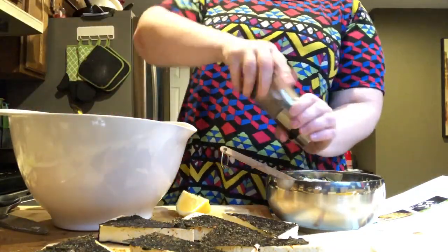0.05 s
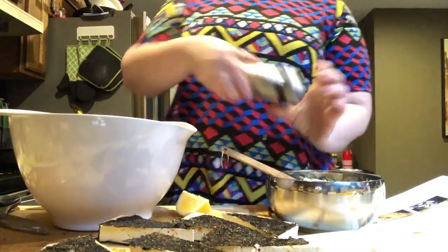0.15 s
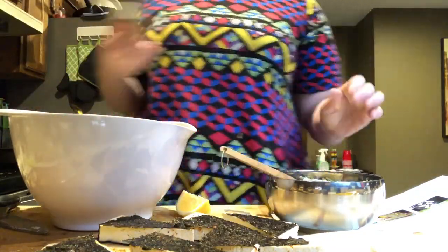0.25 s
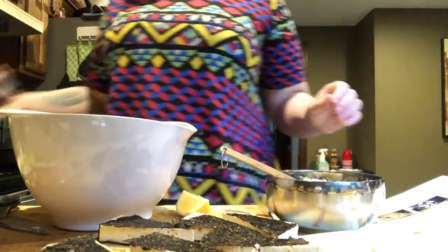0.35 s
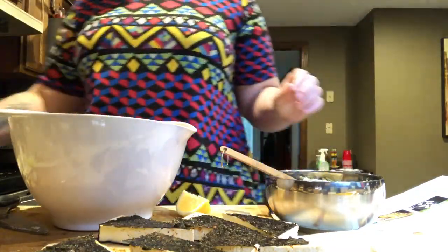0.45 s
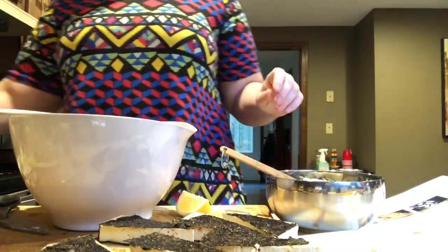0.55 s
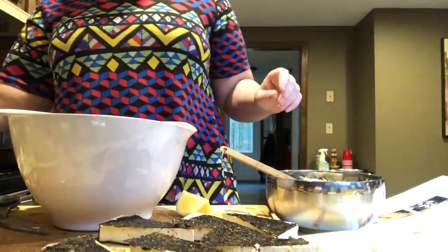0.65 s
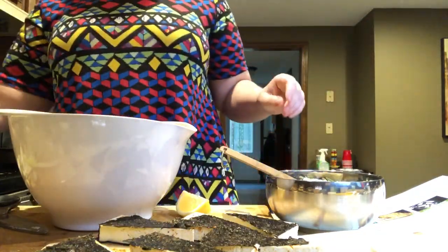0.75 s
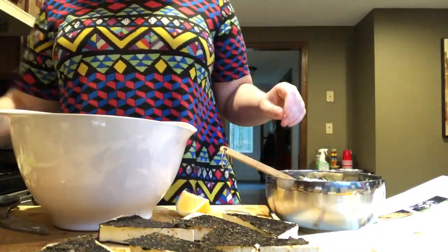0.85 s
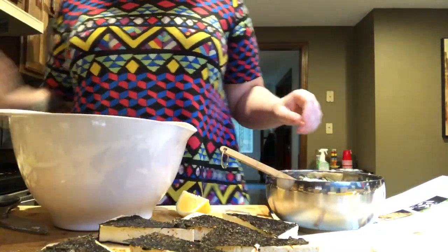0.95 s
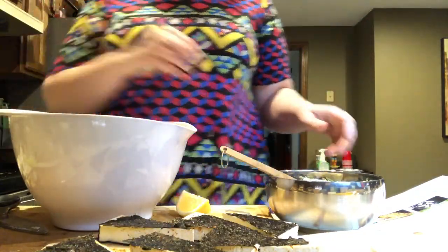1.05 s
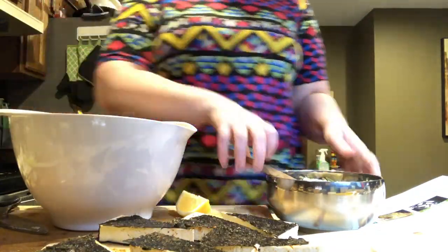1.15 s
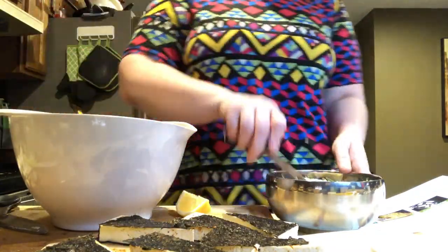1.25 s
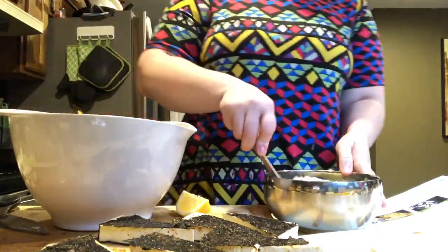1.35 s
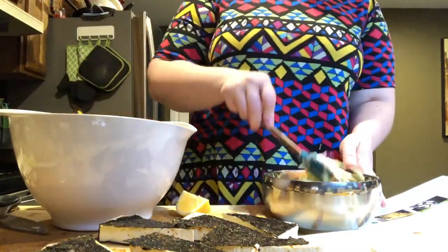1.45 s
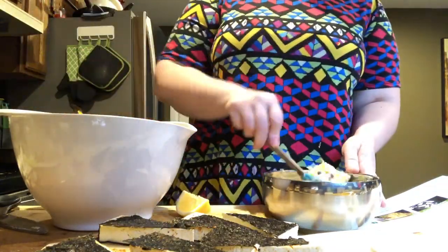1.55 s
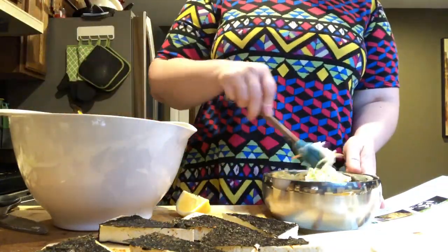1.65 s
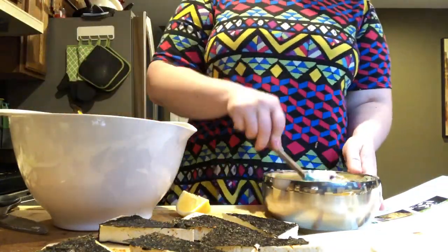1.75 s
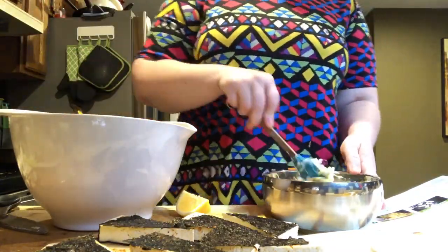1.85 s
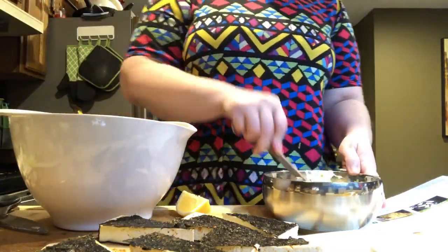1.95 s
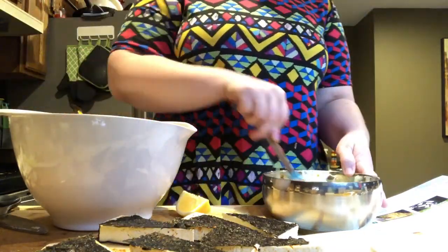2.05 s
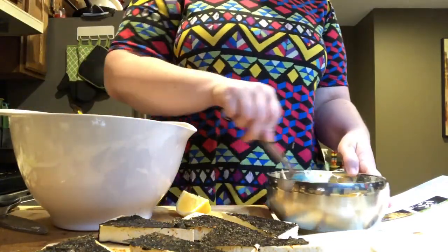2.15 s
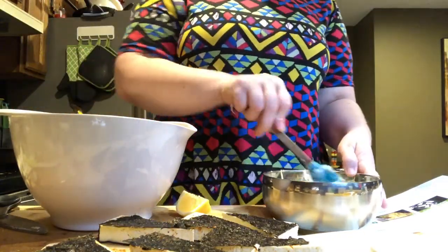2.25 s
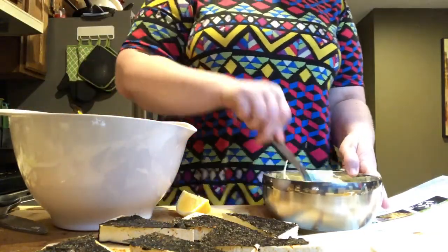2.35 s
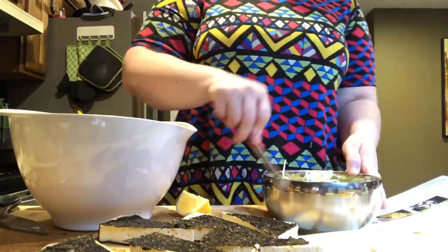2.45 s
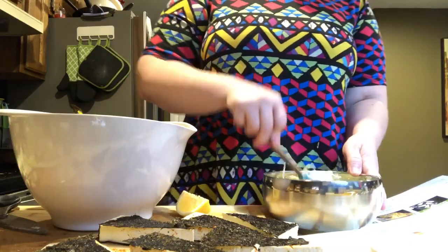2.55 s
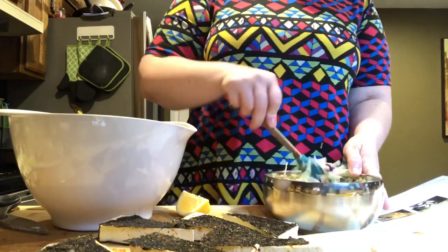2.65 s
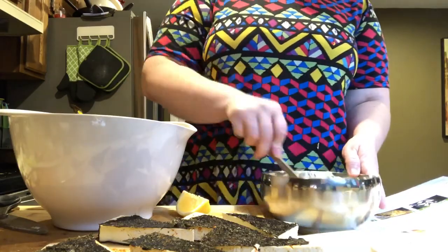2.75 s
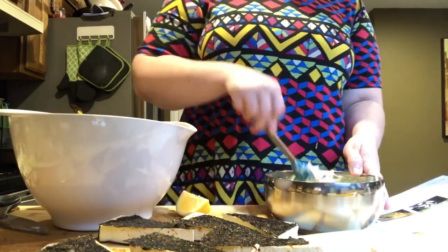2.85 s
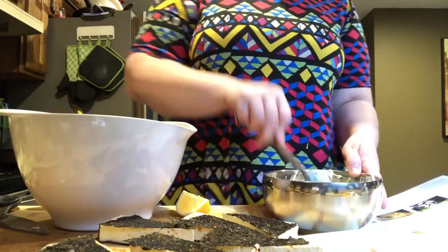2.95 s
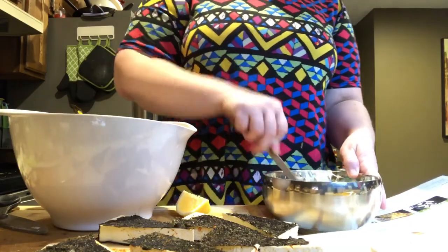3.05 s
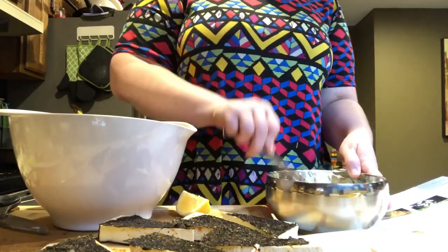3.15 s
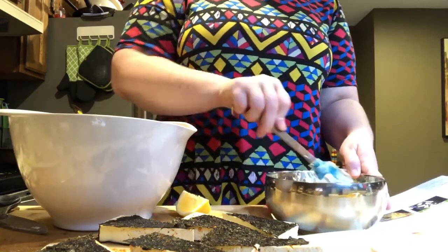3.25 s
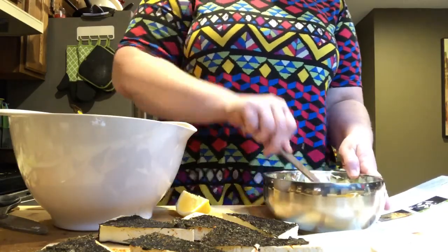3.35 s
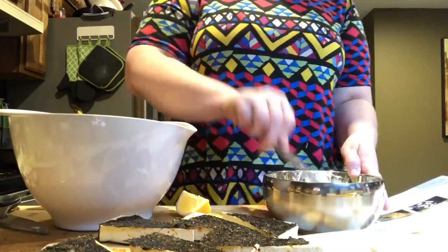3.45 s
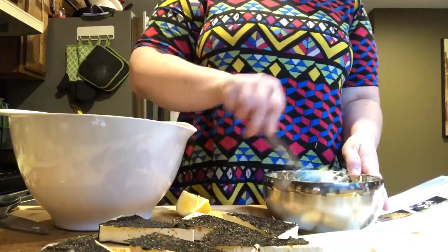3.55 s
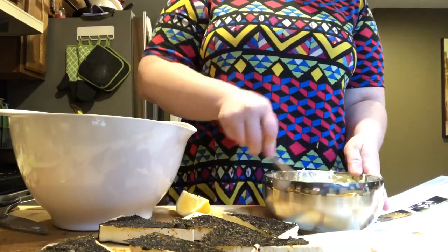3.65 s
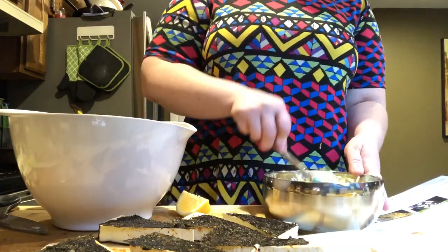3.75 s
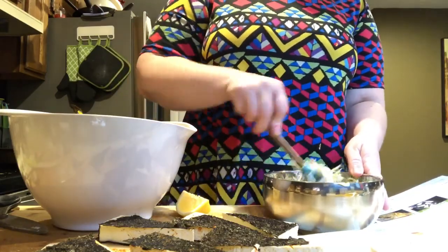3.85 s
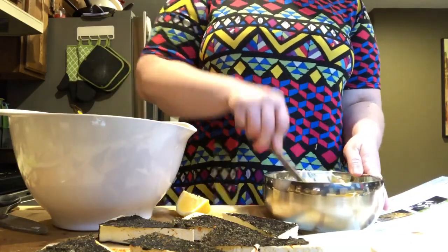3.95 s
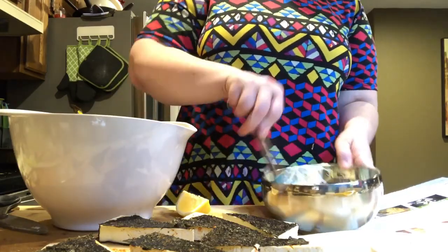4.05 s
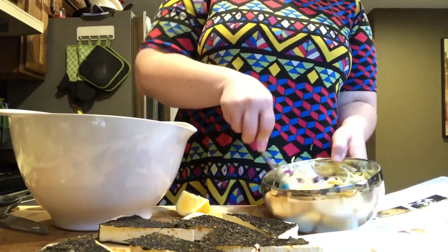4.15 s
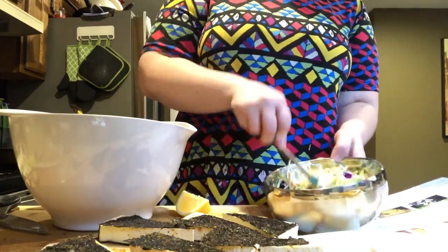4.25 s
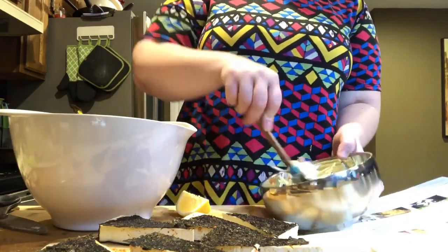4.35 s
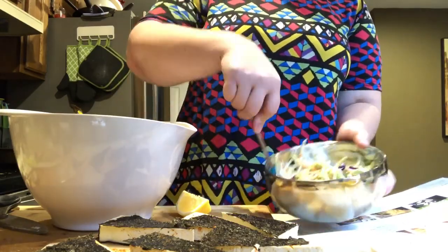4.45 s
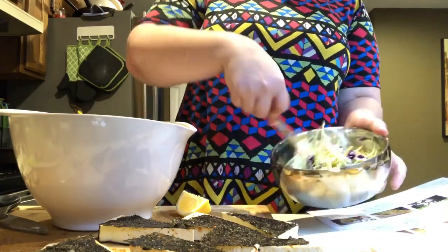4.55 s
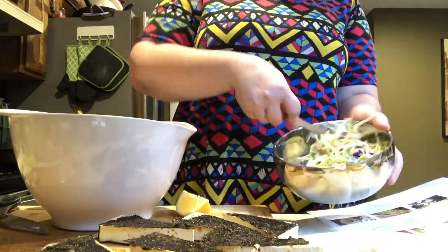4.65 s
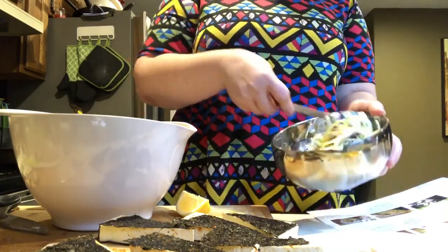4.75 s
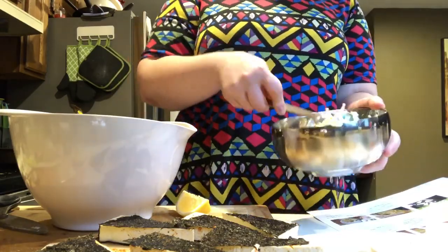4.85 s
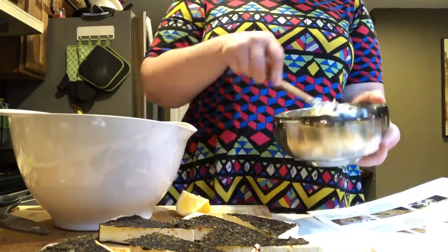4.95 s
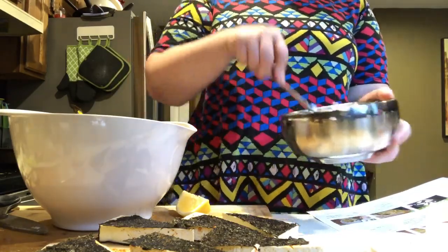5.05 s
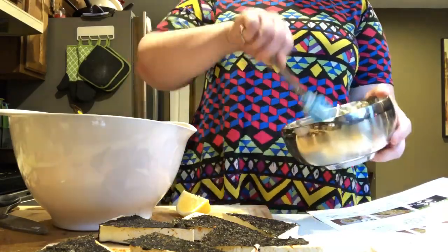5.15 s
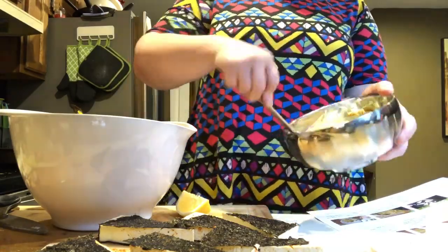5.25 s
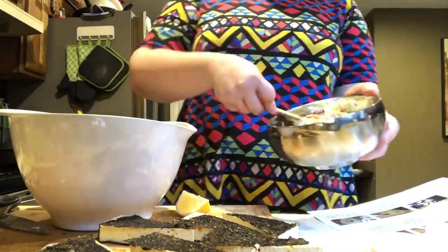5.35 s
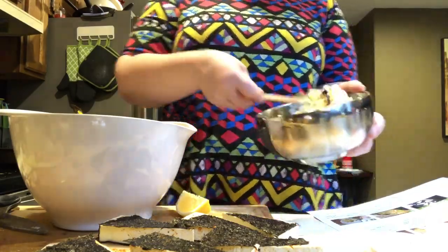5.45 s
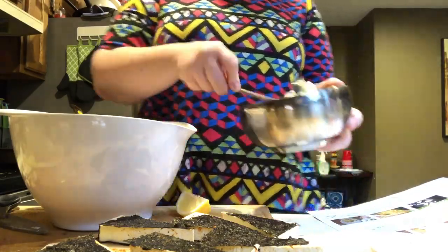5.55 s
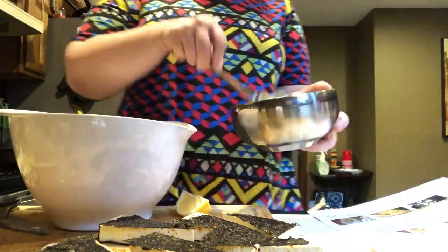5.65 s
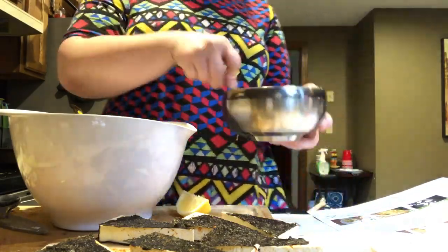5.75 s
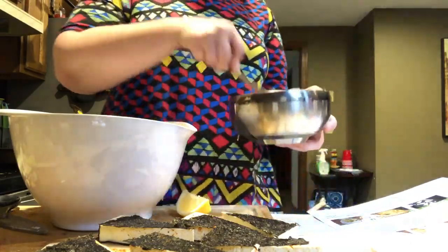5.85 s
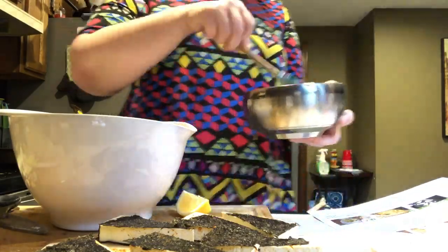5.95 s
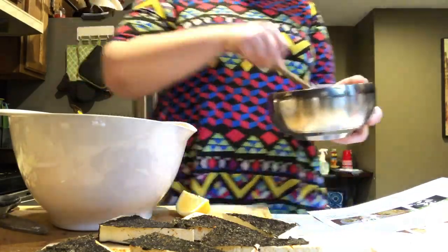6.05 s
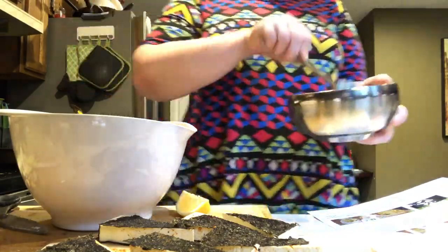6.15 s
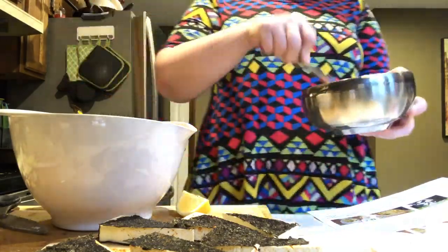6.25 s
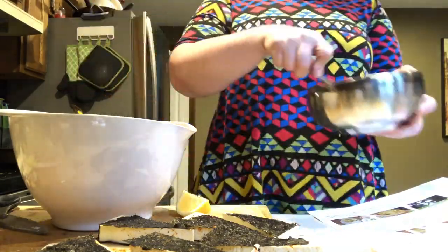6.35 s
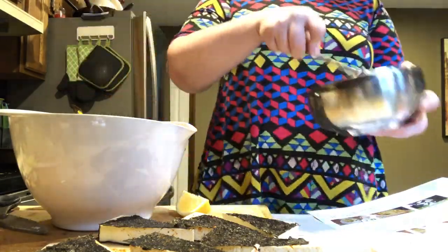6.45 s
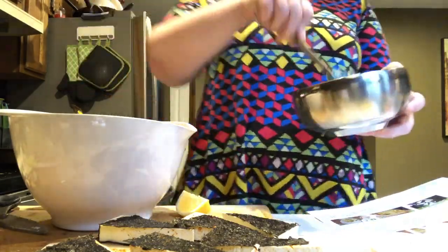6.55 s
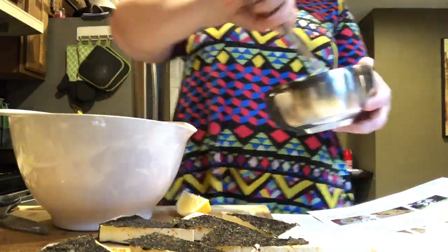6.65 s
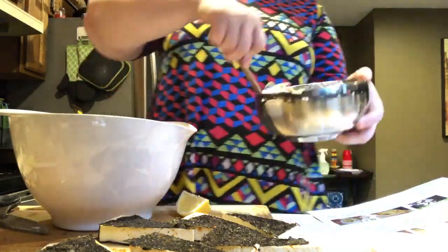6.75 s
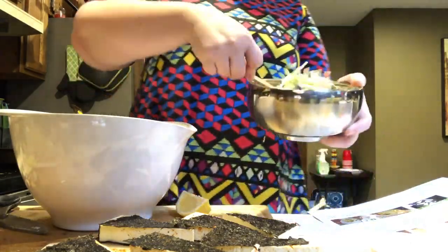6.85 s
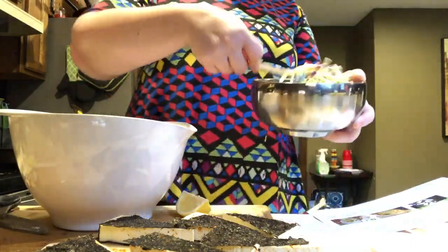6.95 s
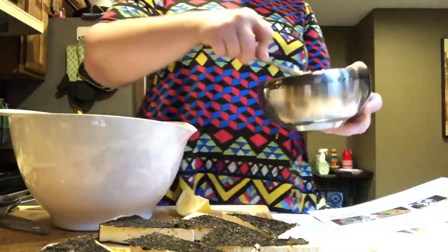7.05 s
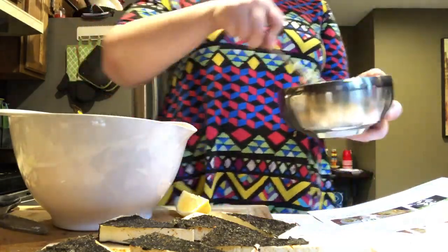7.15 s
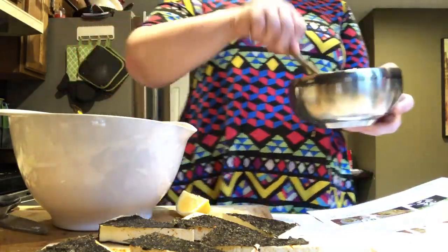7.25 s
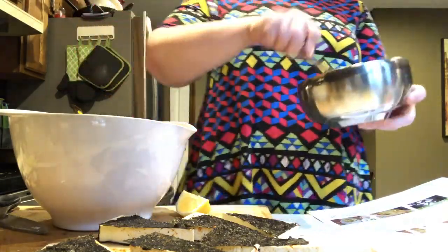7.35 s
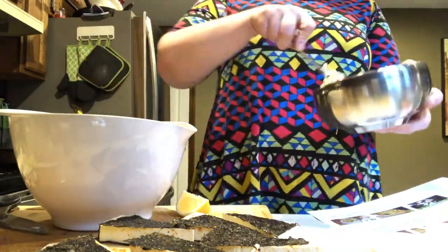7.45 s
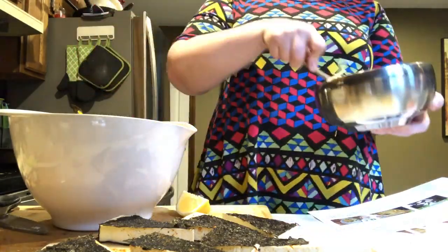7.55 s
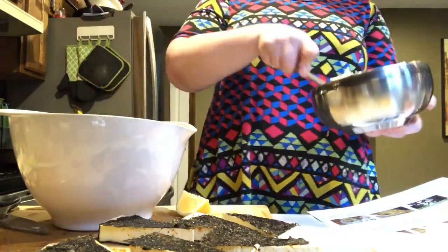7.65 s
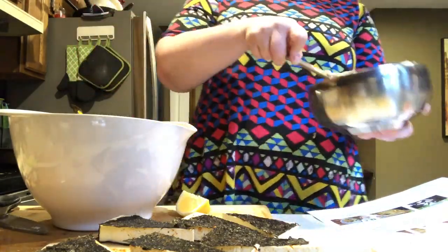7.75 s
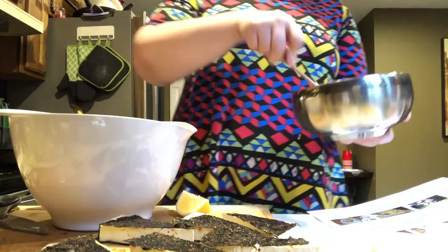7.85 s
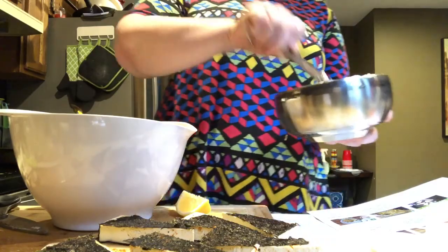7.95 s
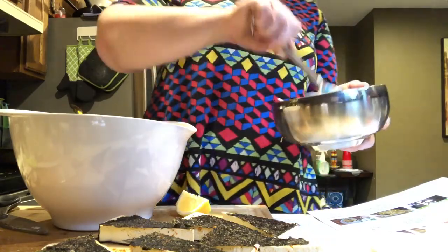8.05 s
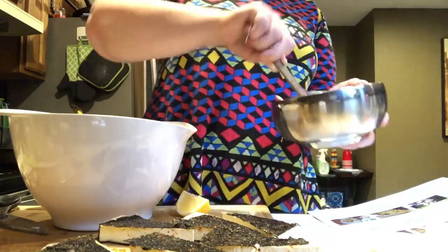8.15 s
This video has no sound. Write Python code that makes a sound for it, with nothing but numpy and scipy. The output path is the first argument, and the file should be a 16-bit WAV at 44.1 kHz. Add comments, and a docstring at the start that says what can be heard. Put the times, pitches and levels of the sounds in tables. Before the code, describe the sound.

A kitchen appliance hums faintly throughout. At the very start a metal spice grinder gives one short crunch. Around 0.4 seconds its grains slide with a bright hiss, and at 0.7 it lands on the counter with a dull clunk, rocking and buzzing faintly. From about 1.4 seconds a spatula stirs a thick, wet mixture in a steel bowl, scraping the wall in quick strokes dotted with hollow pops and sticky snaps. The bowl knocks unevenly on the counter with a short, damped ring. The knocks are loudest and brightest between 2.7 and 3.1 seconds, with a brief squeak of spatula on steel near 2.7. After a last counter knock at 4.4 seconds the bowl is lifted and everything becomes quieter. Soft squelches, light rubbing and small wet smacks continue until the end, just after 8 seconds. Everything sounds close, with slight room reverberation.

```python
"""A kitchen with a humming appliance. A metal spice grinder gives one last crunch, its grains slide as
it is turned upright, and it is set down. A spatula then stirs a thick, wet mixture in a steel bowl: the
bowl knocks on the counter and its wall is scraped, until it is lifted and only soft squelches remain.
Crunch, scrape and squelch are coloured crackle that swells with the hand; knocks are bending waves
with a short ring; hollow pops and sticky snaps dot the stirring."""
import sys
import numpy as np
from scipy import signal
from scipy.fft import rfft, irfft, next_fast_len
from scipy.io import wavfile
from scipy.ndimage import uniform_filter1d, map_coordinates

SR = 44100
rng = np.random.default_rng(int(sys.argv[2]) if len(sys.argv) > 2 else 0)


def dump(signal):
    """Clip the signal to [-1, 1] and save it as 16-bit WAV at the path in sys.argv[1]."""
    limited = np.clip(np.atleast_2d(signal).T, -1, 1)
    pcm = np.round(limited * 32767).astype(np.int16)
    wavfile.write(sys.argv[1], SR, pcm)


N = 362502
TIME = np.arange(N) / SR
HIT = np.arange(SR // 4) / SR  # time axis of a single hit


def amp(db):
    """Decibels to gain."""
    return 10 ** (np.asarray(db) / 20)


def unit(x):
    """Scale to rms 1."""
    return x / np.sqrt(np.mean(x ** 2) + 1e-20)


def even(x, size=3500):
    """Hold a texture at rms 1 over 80 ms: grain and colour stay, slow swings of level go."""
    return x / np.sqrt(np.abs(uniform_filter1d(x ** 2, size)) + 1e-20)


def along(points, hz):
    """Read (f/Hz, value) points on a log frequency axis."""
    freqs, values = np.transpose(points)
    return np.interp(np.log(hz + 1), np.log(freqs + 1), values)


def wobble(rate):
    """A smooth random curve with rate knots a second."""
    return map_coordinates(rng.standard_normal(int(N * rate / SR) + 4), [TIME * rate])


def filtered(x, response):
    """Pass x through a complex frequency response."""
    size = next_fast_len(len(x) + SR // 4)
    return irfft(rfft(x, size) * response(np.fft.rfftfreq(size, 1 / SR)), size)[:len(x)]


def coloured(x, points, size=4096):
    """Minimum-phase EQ through (f/Hz, gain/dB) points: nothing rings ahead of an attack."""
    cepstrum = irfft(np.log(amp(along(points, np.fft.rfftfreq(size, 1 / SR)))))
    causal = np.r_[cepstrum[0], 2 * cepstrum[1:size // 2]]
    return signal.fftconvolve(x, irfft(np.exp(rfft(causal, size))))[:len(x)]


def resonant(x, peaks):
    """Parallel resonances (f/Hz, width/Hz, gain/dB) of alternating polarity."""
    def response(f):
        return sum((-1) ** k * amp(db) * 1j * f * width / (hz * hz - f * f + 1j * f * width)
                   for k, (hz, width, db) in enumerate(peaks))
    return filtered(x, response)


def bending(x, lag_at_1khz):
    """Bending waves travel at a speed that grows with the root of frequency: the bass arrives last."""
    return filtered(x, lambda hz: np.exp(-4j * np.pi * lag_at_1khz * np.sqrt(1000 * hz)))


def fade(t60):
    """Exponential decay of one hit."""
    return np.exp(-np.log(1000) * HIT / max(t60, .001))


def burst(t60):
    """Dying noise of energy 1."""
    noise = rng.standard_normal(len(HIT)) * fade(t60)
    return noise / np.linalg.norm(noise)


def ringing(modes):
    """Modes (f/Hz, level/dB, t60/s), struck with new strengths and phases each time."""
    return sum(amp(db + rng.normal(0, 5.1)) * fade(t60) * np.sin(2 * np.pi * (hz * HIT + rng.random()))
               for hz, db, t60 in modes)


def add(track, s, db, x, size=882):
    """Lay a hit into the track at s seconds; db is the rms of its first 20 ms."""
    part = track[max(round(s * SR), 0):][:len(x)]
    part += amp(db) * x[:len(part)] / np.sqrt(np.mean(x[:size] ** 2))


def crackle(rate, spread_db, life, smooth):
    """Tiny fractures of random size, each a puff of noise, over a smooth share of friction."""
    onsets = rng.random(N) < rate / SR
    sizes = onsets * amp(spread_db * np.minimum(rng.exponential(size=N), 3))
    power = np.abs(signal.fftconvolve(sizes ** 2, fade(life) ** 2)[:N])
    return unit(rng.standard_normal(N) * np.sqrt(power / power.mean() + smooth))


def swell(s, rise, fall, curve=1, depth_db=11.5):
    """Gain of one gesture: peak at s, depth_db down at s - rise and s + fall; more curve is rounder."""
    away = np.maximum((s - TIME) / rise, (TIME - s) / fall)
    near = away < 5
    gain = np.zeros(N)
    gain[near] = amp(-depth_db * away[near] ** curve)
    return gain


def swells(rows, curve=1):
    """Gain of overlapping gestures (peak/s, rise/s, fall/s, level/dB), summed in power."""
    return np.sqrt(sum((amp(db) * swell(s, rise, fall, curve)) ** 2 for s, rise, fall, db in rows))


def appliance(air_db=-59.3):
    """Steady fan air with mains hum and a thin motor whine."""
    air_eq = [(20, -56), (40, -40), (60, -23), (100, -7), (140, -7), (185, -11), (260, -5), (350, -8),
              (540, 1), (820, -11), (1050, -12), (2120, -24), (3140, -30), (4420, -28), (7000, -31.5),
              (16000, -34)]  # fan air: f/Hz, gain/dB
    tones = [(120, -71), (240, -71), (293, -72.5), (436, -80), (528, -75.5), (581, -74), (4323, -82.5),
             (4560, -80), (6961, -89), (7924, -87.5)]  # hum and whine: f/Hz, level/dB
    air = unit(filtered(rng.standard_normal(N), lambda hz: amp(along(air_eq, hz))))
    hum = np.zeros(N)
    for hz, db in tones:
        gain = np.sqrt(2) * amp(db + 1.2 * wobble(3))
        hum += gain * np.sin(2 * np.pi * hz * TIME + .89 * wobble(6.9))
    return amp(air_db) * air + hum


def kitchen(x, stretches=28):
    """Room reverb, with a new noise tail for each stretch as the cook moves."""
    decay = [(150, 0.47), (600, 0.22), (2000, 0.1), (8000, 0.22), (16000, 0.028)]  # reverb time of the room: f/Hz, t60/s
    out = np.zeros(N + SR)
    for part in np.array_split(np.arange(N), stretches):
        hz, t, noise = signal.stft(rng.standard_normal(SR // 2), SR, nperseg=256)
        envelope = amp(-60 * t / along(decay, hz)[:, None]) * (t > .004)
        tail = signal.istft(noise * envelope, SR, nperseg=256)[1]
        echo = signal.fftconvolve(x[part], tail / np.linalg.norm(tail))
        out[part[0]:][:len(echo)] += echo
    return out[:N]


def lid():
    """The loose lid buzzes faintly on the barrel as the grinder settles."""
    buzzes = [(.72, 0.043, 0.061, -57), (.79, .02, 0.067, -59.5), (1.04, 0.016, 0.06, -67)]  # spells of trembling: peak/s, rise/s, fall/s, level/dB
    modes = [(2210, 63, -3), (2550, 120, 1), (2980, 110, 1.5), (3400, 320, -2)]  # lid resonances: f/Hz, width/Hz, gain/dB
    return swells(buzzes) * even(resonant(crackle(rate=400, spread_db=2, life=.01, smooth=.5), modes))


def landing():
    """The grinder is handled, lands on the counter with a dull clunk and rocks on its base."""
    contacts = [(.08, -57, -16), (.6645, -39, 1), (.689, -48, -9), (.707, -47, -10), (.775, -56, -8),
                (.871, -56, -20), (.891, -55.5, -18), (.967, -55, -16), (1.029, -56, -12)]  # clunks: t/s, level/dB, click/dB
    modes = [(285, -6.5, 0.19), (392, -3, 0.069), (613, -13, 0.15), (720, 2, 0.073), (980, 8, 0.023),
             (1400, 2.5, 0.028), (1550, -6, 0.07), (2215, -3.5, 0.09), (2440, -24, 0.19), (3150, -32, 0.22),
             (3840, -22, .14)]  # the grinder on the counter: f/Hz, level/dB, t60/s
    out = np.zeros(N)
    for s, db, click_db in contacts:
        ring = ringing(modes) * (1 - fade(.0044)) * fade(.074)
        clunk = ring / np.linalg.norm(ring) + 1.3 * burst(.04) + .8 * burst(.25)
        eq = [(40, -43), (150, .5), (320, 5.5), (900, -3.5), (2200, click_db),
              (3300, click_db - 11), (4500, click_db - 15.5), (8000, click_db - 23)]
        add(out, s, db, coloured(bending(clunk, .00252), eq))
    return out


def grinder():
    """Spice cracks between the burrs, the barrel rattles out, then loose grains slide and ring it."""
    crunch_eq = [(120, -65), (200, -30), (612, 2), (791, -9), (933, 0.5), (1160, -12.5), (1680, -1),
                 (2210, -13.5), (3560, -5.5), (4120, -11), (4350, -12.5), (8580, -10.5), (16000, -19)]  # cracking spice: f/Hz, gain/dB
    grain_eq = [(1760, -11.5), (3000, -12), (4380, -10.5), (5040, -6), (6800, -4), (8200, 0), (9270, 10),
                (10300, 0), (12200, 9), (13600, 3.5), (15100, 4), (16000, -3)]  # sliding grains: f/Hz, gain/dB
    barrel_modes = [(8000, 1100, 8), (9400, 390, 9.5), (11800, 1400, 3.5)]  # rung by the grains: f/Hz, width/Hz, gain/dB
    cracks = [(.007, 0.014, 0.013, -38.5), (0.02, 0.0087, 0.014, -39.5), (.031, .004, 0.0092, -46)]  # cracks in the last twist: peak/s, rise/s, fall/s, level/dB
    surges = [(.41, .04, .05, -39.5), (.458, .03, .045, -39.5), (.59, .09, .05, -48.5), (.76, .08, .1, -69)]  # grains surge down the barrel: peak/s, rise/s, fall/s, level/dB
    crunch = unit(coloured(crackle(rate=530, spread_db=.5, life=.023, smooth=.31), crunch_eq))
    slide = unit(coloured(crackle(rate=600, spread_db=3.5, life=.005, smooth=.6), grain_eq))
    impacts = np.abs(crackle(rate=400, spread_db=3.5, life=.006, smooth=.1))
    pings = unit(resonant(slide * impacts, barrel_modes))
    rattle_gain = swells([(s, rise, .13, db - 18) for s, rise, _, db in cracks])
    slide_gain = swells(surges, curve=1.7)  # grains start and stop more abruptly than a stroke
    return (swells(cracks) + rattle_gain) * crunch + slide_gain * unit(slide + amp(-1) * pings)


def pops():
    """Short hollow pops near 2 kHz: air pockets in the paste, and the clack of two bowl knocks."""
    hits = [(1.416, -57, 1630), (1.463, -53.5, 1570), (1.648, -48, 1980), (1.69, -60, 1900),
            (1.762, -62.5, 1680), (2.379, -42.5, 1730), (2.536, -51, 1650), (2.6449, -46, 1760),
            (2.656, -40, 1860), (2.819, -35, 1930), (3.499, -46.5, 1550), (3.62, -42.5, 1700),
            (3.7433, -43, 1710), (3.774, -50, 1760), (3.8005, -43, 1810), (3.829, -47, 1800),
            (3.844, -44.5, 1870), (3.866, -47, 1900), (3.895, -57, 1850), (3.9144, -49.5, 1860),
            (4.295, -53.5, 1780), (4.325, -51, 1680), (4.473, -50.5, 1770), (5.311, -55.5, 2000),
            (6.435, -53.5, 1450), (7.104, -63, 1900), (7.579, -55.5, 2010), (7.737, -46, 1680)]  # hollow pops (the clacks are at 2.379 and 2.819 s): t/s, level/dB, f/Hz
    out = np.zeros(N)
    for s, db, hz in hits:
        tone = np.sin(2 * np.pi * hz * HIT) * fade(.005) * (1 - fade(.014)) ** 2
        edge_eq = [(200, -16), (700, -8), (hz, 0), (3200, -16), (4500, -7), (6000, -20), (12000, -27)]
        edge = coloured(burst(.071), edge_eq)
        add(out, s, db, tone / np.linalg.norm(tone) + 2 * edge)
    return out


def snap(hz):
    """A short, bright snap of noise centred on hz."""
    eq = [(hz / 40, -45), (hz / 3, -20), (hz * .7, -8), (hz, 0), (hz * 1.3, -8), (hz * 2.3, -23)]
    return coloured(.3 * burst(.004) + burst(.025), eq)


def ticks():
    """Single snaps, and one clear clink from a light touch on the rim."""
    snaps = [(0.186, -63, 9350), (.407, -60, 8800), (0.453, -54, 11900), (.554, -46.5, 12500),
             (.777, -63, 4200), (1.928, -45.5, 8300), (2.587, -59.5, 7420), (2.7537, -50.5, 9750),
             (3.1211, -50, 9300), (3.196, -54, 10200), (3.22, -50, 8300), (3.9555, -53, 9200),
             (4.368, -60.5, 5600), (4.666, -65, 11240), (4.754, -67.5, 7800), (4.884, -63, 10500),
             (4.941, -53.5, 10200), (5.377, -61.5, 7800), (5.668, -46.5, 6740), (6.916, -69, 7620),
             (7.071, -63.5, 6340), (7.144, -64, 7860), (7.171, -60.5, 10200), (7.328, -67, 12000),
             (7.471, -62.5, 8500), (7.578, -66, 10500), (7.605, -60.5, 6260), (7.8938, -56, 6400),
             (8.148, -64, 6300)]  # crisp ticks and wet smacks: t/s, level/dB, f/Hz
    rim_modes = [(6630, 17.5, 0.15), (7530, 18, 0.1)]  # the rim's ring: f/Hz, level/dB, t60/s
    out = np.zeros(N)
    for s, db, hz in snaps:
        add(out, s, db, snap(hz))
    add(out, s=1.582, db=-56.5, x=ringing(rim_modes))
    return out


def smacks(wetness, per_s=14, wettest_db=-60, spread_db=3, range_hz=(5400, 12200)):
    """Strands of paste part at random moments, smacking harder under a wetter stroke."""
    out = np.zeros(N)
    for when, pitch, size in rng.random((round(per_s * N / SR), 3)):
        smack = snap(np.interp(pitch, [0, 1], range_hz)) * fade(.11)
        add(out, when * N / SR, wettest_db + spread_db * (2 * size - 1), smack)
    return np.sqrt(wetness / wetness.max()) * out


def squeaks(climb_hz_per_s=1100):
    """The blade sticks and slips on bare steel: a rough tone that climbs as it is pressed on."""
    slips = [(2.66, 0.011, 0.03, -39.5, 1957), (2.704, 0.034, 0.032, -40.5, 1990),
             (2.8, 0.0144, 0.016, -52.5, 2110), (3.335, 0.0197, .02, -58, 5300),
             (7.745, .008, .04, -55, 1850)]  # spatula judders: peak/s, rise/s, fall/s, level/dB, f/Hz
    out = np.zeros(N)
    for s, rise, fall, db, hz in slips:
        pitch = hz + climb_hz_per_s * np.clip(TIME - s, -2 * rise, 0) + 110 * wobble(500)
        judder = np.sin(2 * np.pi * np.cumsum(pitch) / SR) * amp(4 * wobble(200))
        out += amp(db) * swell(s, rise, fall) * unit(judder)
    return out


def strokes(rows, grip_db=3, grips_per_s=49):
    """Gains of rub and wet hiss: the paste grips and lets go, and that uneven pressure drives both."""
    grip = amp(grip_db * wobble(grips_per_s))
    rub_gain = swells([(*timing, db) for *timing, db, _ in rows])
    hiss_gain = swells([(*timing, db) for *timing, _, db in rows])
    return grip * rub_gain, grip * hiss_gain


def folding():
    """With the bowl in the hand the paste squelches softly; its tiny cavities keep changing size."""
    folds = [(4.63, 0.083, 0.13, -66.5, -66.5), (4.95, 0.017, 0.031, -57, -61),
             (5.08, 0.025, 0.014, -57.5, -59), (5.35, 0.097, 0.17, -63, -64),
             (5.53, 0.016, 0.031, -55, -63), (5.67, 0.027, 0.036, -51, -56),
             (5.79, .012, 0.036, -57.5, -59.5), (5.835, 0.017, 0.034, -55, -64),
             (5.95, 0.047, 0.082, -63, -70.5), (6.16, 0.039, 0.14, -68.5, -66),
             (6.435, 0.045, 0.024, -60.5, -61.5), (6.535, 0.043, 0.041, -59, -63),
             (6.9, 0.28, 0.27, -62.5, -68), (7.11, 0.0096, 0.032, -55.5, -65),
             (7.17, 0.027, 0.024, -56, -59.5), (7.32, 0.041, 0.026, -67, -67),
             (7.45, 0.03, 0.038, -60.5, -58), (7.6, 0.027, 0.017, -50.5, -54.5),
             (7.74, 0.018, 0.035, -51.5, -59.5), (7.89, 0.03, 0.017, -52, -57.5),
             (8.08, 0.061, 0.048, -55, -65.5), (8.21, 0.044, 0.028, -55.5, -63.5)]  # spatula strokes: peak/s, rise/s, fall/s, rub/dB, hiss/dB
    held_modes = [(1540, 420, -9.5), (1920, 80, -7), (2102, 60, 0.5), (3200, 280, -12)]  # the bowl in the hand: f/Hz, width/Hz, gain/dB
    wet_eq = [(1200, -40), (3000, 6), (4600, 4.5), (6400, -4.5), (9000, -6), (12500, -2.5), (16000, -1)]  # wet paste: f/Hz, gain/dB
    rub_eq = [(60, -32), (450, 15), (1000, 18), (3000, 4), (7000, -17)]
    rub_gain, hiss_gain = strokes(folds)
    squelch = crackle(rate=240, spread_db=3, life=.012, smooth=.6)
    rub = unit(coloured(resonant(squelch, held_modes), rub_eq))
    wet = coloured(squelch, wet_eq)
    # three narrow bands flicker in level to stand for the cavities
    cavities = sum(resonant(wet, [(hz, hz / 12, 0)]) * amp(4 * wobble(22)) for hz in (6350, 7300, 9200))
    hiss = unit(unit(cavities) + 1.3 * unit(wet))
    return rub_gain * even(rub) + hiss_gain * even(hiss) + smacks(hiss_gain)


def stirring():
    """The spatula drags thick paste over the wall of the standing bowl, which rings in its modes."""
    stirs = [(1.415, 0.11, 0.095, -52.5, -61.5), (1.59, 0.047, 0.097, -50.5, -60),
             (1.65, 0.014, 0.033, -44, -73), (1.85, 0.067, 0.032, -50, -59.5),
             (1.932, 0.0053, 0.041, -42, -51), (2.01, 0.036, 0.035, -51.5, -60.5),
             (2.15, 0.12, 0.2, -52, -65), (2.25, 0.083, 0.075, -57.5, -56.5),
             (2.39, 0.049, 0.034, -41, -58), (2.51, 0.034, 0.02, -47, -74), (2.68, 0.11, 0.036, -48, -55.5),
             (2.81, 0.25, 0.26, -50.5, -61.5), (3.11, 0.042, 0.034, -55, -59),
             (3.215, 0.049, 0.043, -47, -51.5), (3.34, 0.043, 0.056, -65, -58.5),
             (3.4, 0.042, 0.019, -40.5, -57), (3.52, 0.046, 0.052, -44.5, -55.5),
             (3.68, 0.099, 0.042, -46, -59), (3.84, 0.05, 0.076, -49, -60.5),
             (3.97, 0.022, 0.046, -48.5, -58), (4.13, 0.026, 0.097, -52, -61),
             (4.235, 0.17, 0.033, -56.5, -60.5), (4.325, 0.081, 0.057, -48, -61)]  # spatula strokes: peak/s, rise/s, fall/s, rub/dB, hiss/dB
    wall_modes = [(1610, 157, 14.5), (1850, 340, 11.5), (2350, 84, 10), (2708, 140, 9), (3830, 82, 10.5),
                  (4340, 71, 7.5), (4810, 210, 12.5), (5280, 92, 13.5), (6640, 120, 7), (7590, 120, 9),
                  (8350, 110, 4.5), (9880, 140, 13.5), (12900, 350, -2), (15000, 400, 0)]  # the scraped wall: f/Hz, width/Hz, gain/dB over the bare friction
    rub_eq = [(100, -37.5), (250, 9.5), (550, 15), (900, 1.5), (1800, -8), (2700, -7), (3400, -10),
              (4200, -20), (8000, -26)]
    hiss_eq = [(2000, -58), (3500, -9), (4800, 0), (6000, 0), (10000, -2.5), (16000, -6)]
    rub_gain, hiss_gain = strokes(stirs)
    grit = crackle(rate=300, spread_db=3, life=.014, smooth=.45)
    # the shifting paste damps now this mode, now that one
    scrape = grit + sum(resonant(grit, [mode]) * amp(5 * wobble(14)) for mode in wall_modes)
    rub = even(coloured(scrape, rub_eq))
    hiss = even(coloured(scrape, hiss_eq))
    return rub_gain * rub + hiss_gain * hiss + smacks(hiss_gain)


def struck_at(spot_hz, lift_db=9, reach_octaves=.15, detune=.012):
    """The bowl's modes for one knock: the spot favours some, and the paste detunes them all a little."""
    steel_modes = [(290, -2.5, 0.22), (530, 4, 0.075), (650, 8, 0.028), (870, 9, 0.085), (1250, 13, 0.024),
                   (2010, 14, 0.1), (2400, 18.5, 0.032), (2680, 22.5, 0.018), (3320, 12, 0.041),
                   (4700, 23, 0.046), (5390, 26, 0.04), (6300, 13, 0.079), (7330, 12, .1), (8090, 26, .09),
                   (9950, 18, 0.11), (10900, 18, .07), (15000, 15, .05)]  # the filled steel bowl: f/Hz, level/dB, t60/s
    modes = []
    for hz, db, t60 in steel_modes:
        lift = lift_db * np.exp(-(np.log2(hz / spot_hz) / reach_octaves) ** 2)
        modes.append((hz * (1 + detune * rng.standard_normal()), db + lift, t60))
    return modes


def knocks():
    """The bowl hits the counter: a bending wave in thin steel, then a damped ring. Harder is brighter."""
    # contacts: t/s, level/dB, hardness/0-1, looseness/0-1, thud/dB, f/Hz that the spot favours
    contacts = [(1.5224, -45.5, 0, 0.48, 3, 290), (1.96, -47.5, 0, 0.13, 2, 290),
                (2.009, -43, 0.2, 0.45, -15, 650), (2.014, -42, .3, 0.35, -5, 290),
                (2.0931, -37.5, 0.33, 0.58, -3, 650), (2.146, -49, 0, .14, 1, 290),
                (2.293, -37, 0.46, 0.64, -3, 650), (2.38, -42.5, 0.2, 0.5, -3, 530),
                (2.492, -39, 0.26, 0.98, -4, 530), (2.7063, -24.5, 0.67, 0.3, -22, 1250),
                (2.817, -33.5, 0.47, 0.56, -6, 2010), (2.856, -26, 0.85, 0.01, -18, 4700),
                (2.929, -35, 0.75, 0.6, -11.5, 2400), (2.9542, -35, 0.57, 0.44, -10, 2680),
                (2.9879, -28.5, 0.46, 0.27, -11, 2400), (3.081, -33, 0.76, .99, -6.5, 2400),
                (3.229, -35.5, 0.57, 0.84, -10, 530), (3.396, -34.5, 0.46, 0.8, -3.5, 530),
                (3.563, -44, .02, 0.44, -2, 290), (3.597, -43.5, 0.3, 0.16, -14, 650),
                (3.66, -43, 0.1, 0.92, -1, 290), (4.01, -37, 0.77, .08, -12, 650),
                (4.093, -42.5, 0.2, 0.92, -0.5, 650), (4.118, -42.5, 0.4, 0.92, -4, 2400),
                (4.4059, -36.5, 0.5, .55, -1, 870), (5.31, -55.5, 0.7, 0.02, -15, 1250)]
    out = np.zeros(N)
    for s, db, hard, loose, thud_db, spot_hz in contacts:
        # a loosely held bowl meets the counter gently and chatters on
        impact = amp(-7 * loose) * (HIT == 0)
        chatter = amp(-9 + 10 * loose) * burst(.04 + .03 * loose) * (1 - fade(.015 * loose))
        ring = amp(-50.5) * ringing(struck_at(spot_hz)) * fade(.12)
        blow = impact + ring + chatter
        blow[round(.0017 * SR)] += .4  # the counter top throws the wave back
        mid_db, treble_db = -19 + 10 * hard, -34 + 29 * hard
        body_eq = [(20, -82), (60, thud_db - 22), (130, thud_db - .5), (260, thud_db + 12.5),
                   (400, -1.5), (590, 4.5), (790, -4), (1300, -7), (2000, mid_db - 4),
                   (3500, (mid_db + treble_db) / 2 - 8.5), (5000, treble_db - 12.5),
                   (9000, treble_db - 18.5), (15000, treble_db - 24.5)]
        # every knock meets the bowl at another spot, which colours it
        spot_eq = [(hz, 2.2 * rng.standard_normal()) for hz in np.geomspace(400, 12000, 16)]
        knock = coloured(coloured(blow, body_eq), spot_eq)
        add(out, s, db, bending(knock, .0013 + .0015 * loose))
    return out


def scene():
    """Mono mix: knocks, clunks and small sounds, each with its own reverb send, over the appliance."""
    bowl, clunks = knocks(), landing()
    small = grinder() + lid() + pops() + ticks() + stirring() + squeaks() + folding()
    room = kitchen(amp(-15) * bowl + amp(-8) * clunks + amp(-13) * small)
    return (bowl + clunks + small + room + appliance())[None]


def record(dry):
    """A steep low-pass takes off the very top."""
    top_hz = 15950
    return filtered(dry[0], lambda hz: 1 / np.sqrt(1 + (hz / top_hz) ** 200))[None]


dry = scene()
out = record(dry)
dump(out)
```